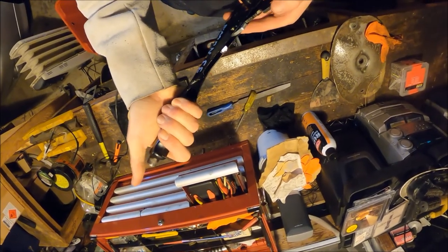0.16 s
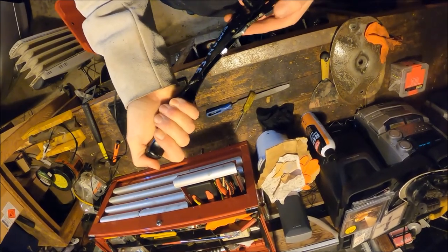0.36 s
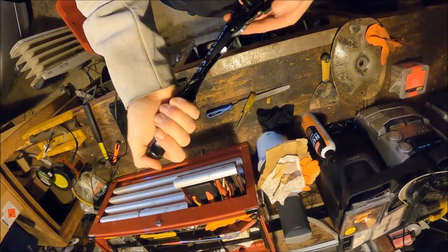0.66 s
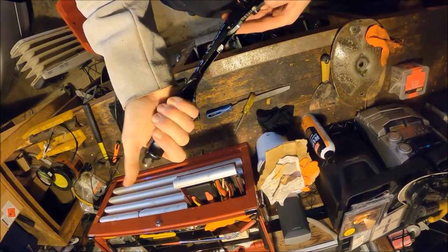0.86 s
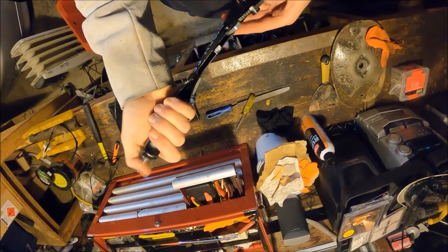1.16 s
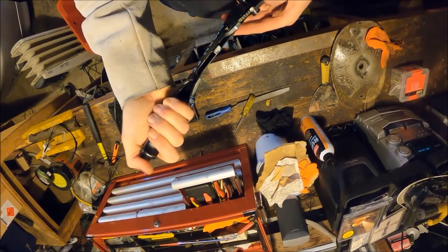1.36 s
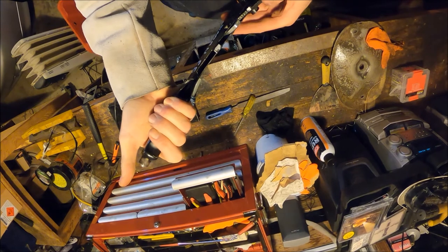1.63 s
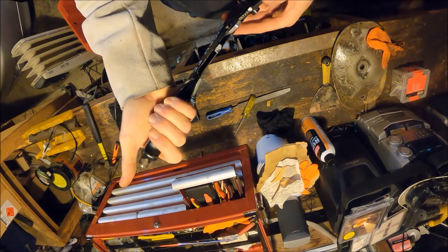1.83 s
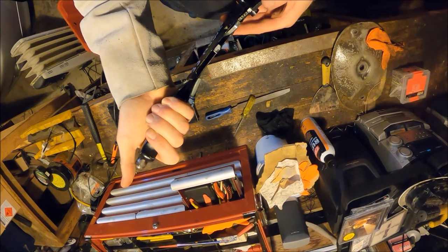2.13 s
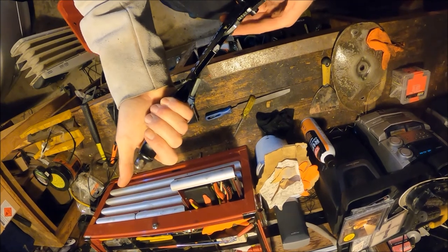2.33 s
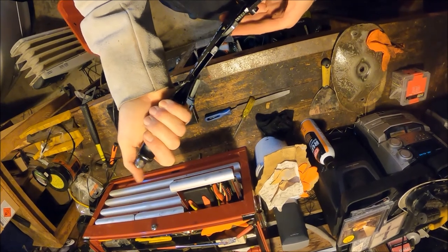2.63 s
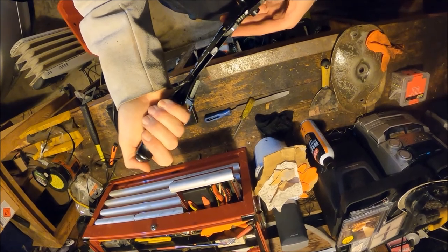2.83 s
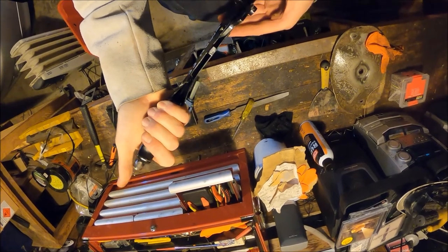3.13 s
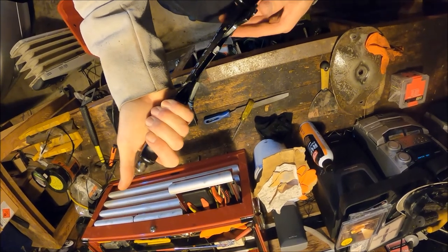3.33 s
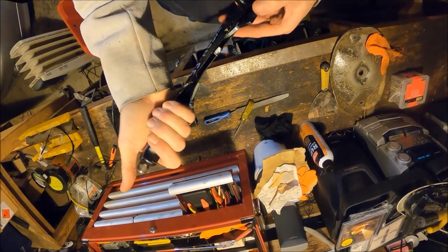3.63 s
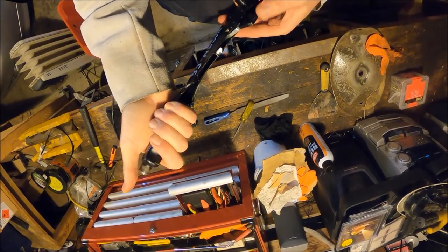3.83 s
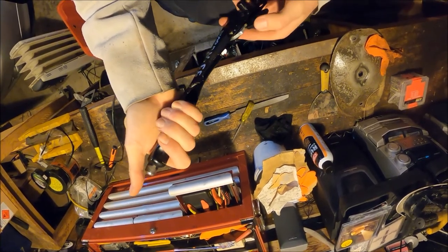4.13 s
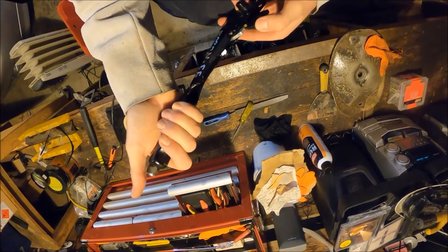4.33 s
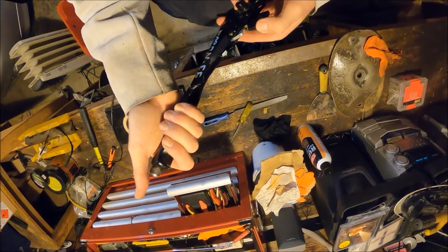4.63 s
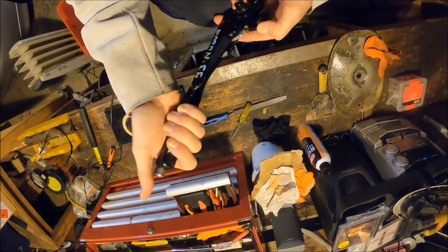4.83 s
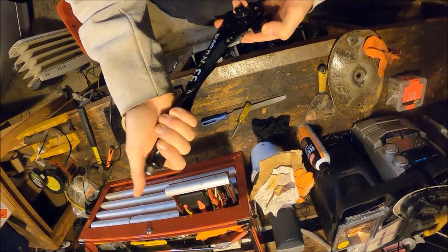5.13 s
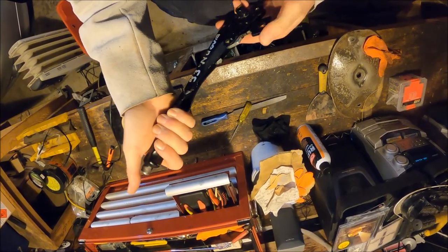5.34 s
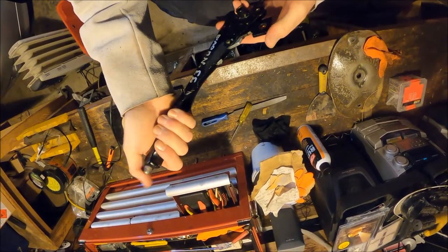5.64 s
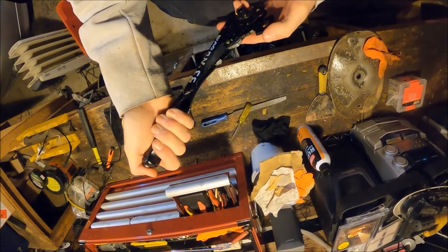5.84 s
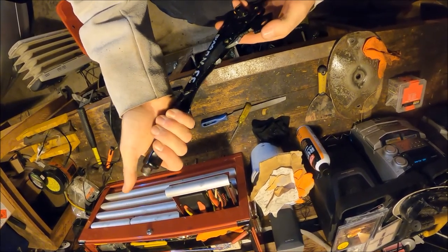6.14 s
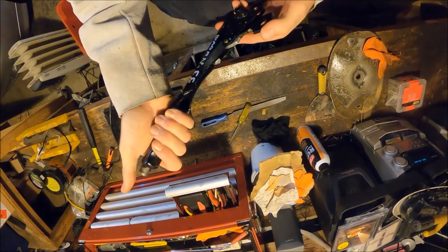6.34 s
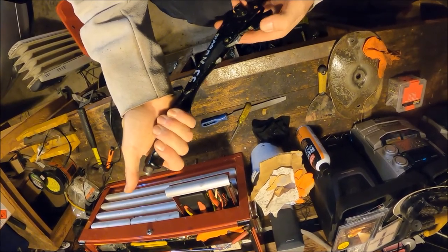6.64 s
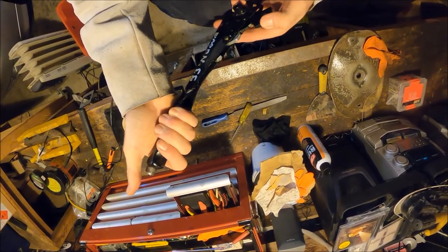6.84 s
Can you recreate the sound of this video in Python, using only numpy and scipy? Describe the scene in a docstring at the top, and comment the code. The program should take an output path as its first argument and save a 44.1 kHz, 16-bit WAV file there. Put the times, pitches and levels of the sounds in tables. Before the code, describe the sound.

Close metallic clicks as a loose handbrake lever's button is pressed and snapped back in an even run, then twice more, in a small workshop.

```python
"""A loose car handbrake lever is worked by hand over a workshop bench, close to the microphone.
The thumb presses the release button and lets it snap back, five times in an even run, then twice more;
the pawl rattles after the sixth snap and later drops into ratchet teeth. Each contact is a chattering push
that rings the same steel modes, each rub a shower of tiny taps into them; thuds and a palm slide are noise.
A small room answers with decaying noise, over a low rumble, faint hiss and thin whine of filtered noise."""
import sys
import numpy as np
from scipy import signal
from scipy.fft import rfft, irfft, next_fast_len
from scipy.io import wavfile

SR = 44100
rng = np.random.default_rng(int(sys.argv[2]) if len(sys.argv) > 2 else 0)


def file_out(sig):
    """Save sig as 16-bit WAV at sys.argv[1]."""
    # one column per channel
    cols = np.atleast_2d(sig).T
    # limit, then scale
    lim = np.clip(cols, -1, 1)
    pcm = np.round(lim * 32767).astype(np.int16)
    wavfile.write(sys.argv[1], SR, pcm)


N = 308259
# signs of the left and right microphone ports
SIDES = np.array([[1], [-1]])


def undb(db):
    """Decibels to gain."""
    return 10 ** (np.asarray(db) / 20)


def rms(x):
    """Root mean square."""
    return np.sqrt(np.mean(x ** 2))


def at_hz(hz, table, axis=1):
    """Read a column of a table on a log-frequency axis."""
    table = np.array(table, float)
    return np.interp(np.log(np.maximum(hz, 1)), np.log(table[:, 0]), table[:, axis])


def band(x, lo, hi, order=2):
    """Butterworth band-pass."""
    sections = signal.butter(order, [lo, min(hi, SR / 2 - 1)], "band", fs=SR, output="sos")
    return signal.sosfilt(sections, x)


def add(out, s, sound):
    """Mix a sound in from time s."""
    i = max(int(s * SR), 0)
    out[..., i:i + sound.shape[-1]] += sound[..., :N - i]


# Contact levels below are set before the mix trims in scene(); brightness is the pawl's share of the blow.
# the pressed button lifts the pawl, slides, meets its stop and rebounds:
# (lift time [s], lift level [dB], lift brightness [dB], stop time [s], stop level [dB], slide level [dB],
#  rebound level [dB], extra handle and rod level [dB], pitch favoured by the place of the blow [Hz])
BUTTON_PRESSES = [(0.0024, -34.5, -14, 0.015, -34.5, -42, -38.5, 0, 3400),
                  (0.3842, -30.5, -0.5, 0.4012, -30, -52, -50, 0, 3600),
                  (0.711, -35.5, -17, 0.7515, -29, -42, -39.5, 0, 3450),
                  (1.089, -37, -1, 1.1132, -28.5, -37, -39, 0, 3400),
                  (1.4633, -38, -23, 1.506, -30.5, -40, -39, -1, 3400),
                  (2.7946, -33.5, -7, 2.856, -37, -62, -42, -4, 3640),
                  (5.7894, -48, 6, 5.7993, -35.5, -46, -45, 5, 2650)]
# the button is let go, its rod knocks and the pawl snaps home:
# (knock time [s], knock level [dB], snap time [s], snap level [dB], snap brightness [dB],
#  chatter decay [s], favoured pitch [Hz])
BUTTON_RELEASES = [(0.2006, -30, 0.2072, -31, 5.5, 0.0034, 3800),
                   (0.5605, -27.5, 0.5664, -30, -2, 0.0048, 3560),
                   (0.9157, -28, 0.9235, -34, 2.5, 0.0038, 3500),
                   (1.2915, -34.5, 1.3029, -21, 0, 0.0012, 3750),
                   (1.6765, -32.5, 1.6833, -19.5, 0, 0.0024, 3460),
                   (3.0591, -43, 3.086, -22, 2, 0.0008, 2700),
                   (6.1452, -31, 6.1512, -26.5, -1, 0.0013, 3400)]
# the pawl rattles after a snap (3.09 s) or drops into ratchet teeth (5.02 to 5.08 s):
# (time [s], level [dB], brightness [dB], chatter decay [s], favoured pitch [Hz])
PAWL_STRIKES = [(3.095, -23, -16, 0.0042, 3520), (3.0994, -31, 5, 0.0034, 5400),
                (5.0235, -18, -4.5, 0.0007, 3680), (5.0485, -20, -2.5, 0.0016, 2740),
                (5.0823, -21.5, -0.5, 0.0005, 2780)]
# the slack frame ticks as the lever is handled:
# (time [s], level [dB], brightness [dB], favoured pitch [Hz])
FRAME_TICKS = [(0.062, -47, -13, 3400), (1.6057, -43.5, -12, 2800), (2.137, -53.5, -33, 3640),
               (2.7736, -56, -8.5, 3500), (2.867, -42, -15, 3550), (3.128, -35, -5, 3700),
               (3.7254, -44.5, -15.5, 3300), (4.1409, -54, -4, 3900), (4.1882, -44, -15, 1850),
               (5.002, -52, -6, 3800), (5.0133, -39, -10, 3900), (5.3412, -38, -11, 3050),
               (5.776, -47, -7, 3920), (6.9826, -55, -7, 3270)]
# the loose button rod taps in its tube: (time [s], level [dB])
TUBE_TAPS = [(0.1377, -58), (0.3677, -49), (0.4494, -50), (0.6207, -43), (0.766, -38), (0.962, -44),
             (1.2154, -57), (3.0286, -51), (3.0721, -43), (4.2394, -36), (5.3031, -51), (5.762, -52),
             (6.0, -46.5), (6.545, -52)]
# how each kind of contact shares its force among the parts [dB]
LIFT_HANDLE_DB, LIFT_ROD_DB = -22, -14
STOP_HANDLE_DB, STOP_ROD_DB, STOP_PAWL_DB = -17.5, -9.5, -7
KNOCK_HANDLE_DB, KNOCK_ROD_DB, KNOCK_PAWL_DB = -10.5, -1.5, -1.5
SNAP_HANDLE_DB, SNAP_ROD_DB = -17, -12
STRIKE_HANDLE_DB, STRIKE_ROD_DB = -22, -12
TICK_HANDLE_DB, TICK_ROD_DB = -14.5, -5
TAP_HANDLE_DB, TAP_FRAME_DB, TAP_PAWL_DB = -22, -12, -24
REBOUND_HANDLE_DB, REBOUND_ROD_DB, REBOUND_PAWL_DB = -24, -11, -9.5
# chatter decay of a light contact; pitch favoured where the rod taps
CHATTER_S, TAP_HZ = 0.0012, 1870
# the spring throws the button back once after each stop and each snap (dB relative to the snap)
STOP_REBOUND_S, SNAP_REBOUND_S, SNAP_REBOUND_DB = 0.025, 0.03, -16


def contacts():
    """Every blow of the mechanism: (s, dB, dB of handle, rod, frame and pawl, chatter s, favoured Hz)."""
    rebound = (REBOUND_HANDLE_DB, REBOUND_ROD_DB, 0, REBOUND_PAWL_DB)
    for lift_s, lift_db, bright_db, stop_s, stop_db, _, rebound_db, body_db, place_hz in BUTTON_PRESSES:
        lift = (LIFT_HANDLE_DB + body_db, LIFT_ROD_DB + body_db, 0, bright_db)
        stop = (STOP_HANDLE_DB + body_db, STOP_ROD_DB + body_db, 0, STOP_PAWL_DB)
        yield lift_s, lift_db, lift, CHATTER_S, place_hz
        yield stop_s, stop_db, stop, CHATTER_S, place_hz
        yield stop_s + STOP_REBOUND_S, rebound_db, rebound, CHATTER_S, place_hz
    for knock_s, knock_db, snap_s, snap_db, bright_db, chatter_s, place_hz in BUTTON_RELEASES:
        knock = (KNOCK_HANDLE_DB, KNOCK_ROD_DB, 0, KNOCK_PAWL_DB)
        snap = (SNAP_HANDLE_DB, SNAP_ROD_DB, 0, bright_db)
        yield knock_s, knock_db, knock, chatter_s, place_hz
        yield snap_s, snap_db, snap, chatter_s, place_hz
        yield snap_s + SNAP_REBOUND_S, snap_db + SNAP_REBOUND_DB, rebound, chatter_s, place_hz
    for s, db, bright_db, chatter_s, place_hz in PAWL_STRIKES:
        yield s, db, (STRIKE_HANDLE_DB, STRIKE_ROD_DB, 0, bright_db), chatter_s, place_hz
    for s, db, bright_db, place_hz in FRAME_TICKS:
        yield s, db, (TICK_HANDLE_DB, TICK_ROD_DB, 0, bright_db), CHATTER_S, place_hz
    for s, db in TUBE_TAPS:
        yield s, db, (TAP_HANDLE_DB, 0, TAP_FRAME_DB, TAP_PAWL_DB), CHATTER_S, TAP_HZ


def chatter(chatter_s, first_blow=3.5, evenness=.7):
    """The force of one contact: a blow, then dying micro-bounces, with the spectrum partly evened out."""
    t = np.arange(SR // 60) / SR
    bounces = rng.standard_normal(len(t)) * rng.random(len(t)) ** 2
    push = bounces * np.exp(-t / chatter_s)
    push[0] = first_blow
    spectrum = rfft(push, 2 * len(t))
    return irfft(spectrum / np.abs(spectrum) ** min(evenness, 1))[:len(t)]


# strong modes of the lever: (pitch [Hz], relative level [dB], time to fall 60 dB [s])
STRONG_MODES = [(757, -1, .025), (1081.4, 1, .02), (1715, -3.5, 0.06), (1825, 4.5, 0.036), (1803, -37, .25),
                (2692, 4.5, 0.049), (2686, -31.5, .38), (2745, -28, .42), (2935, -8.5, .035),
                (3475, -0.5, 0.047), (3587, 2.5, .028), (3600, -34, 0.23), (4260, -10, 0.012),
                (4760, -30.5, .28), (5420, -2, 0.071), (5150, -34, 0.45), (5954, 1.5, 0.046),
                (6200, -8, 0.07), (7620, -11.5, .035), (8490, 1, 0.017), (9000, -2, 0.022),
                (9160, -4, 0.022), (10500, -9.5, 0.056)]
# the crowd of weak modes between them: (pitch [Hz], relative level [dB])
MODE_CROWD = [(300, -12), (750, -1.5), (1400, 0), (1900, -3), (2400, 1.5), (3300, 3.5), (5000, -1),
              (7000, -1.5), (9000, -2.5), (10500, -8.5), (12000, -16), (14000, -20.5), (16000, -32)]
# where handle, rod, frame and pawl each ring: (low edge [Hz], high edge [Hz])
PART_BANDS = [(300, 1400), (1400, 2300), (2300, 4800), (4800, 16000)]


def lever_modes(weak_db=-3):
    """Each part's strong pitches, their decaying rings (modes x time) and a filter for its weak modes."""
    t = np.arange(SR // 5) / SR
    hz, db, t60 = np.transpose(STRONG_MODES)
    spin_and_decay = 2j * np.pi * hz - np.log(1000) / t60
    rings = undb(db)[:, None] * np.exp(np.outer(spin_and_decay, t))
    grid = np.linspace(0, SR / 2, 257)
    # folding the cepstrum makes the filter minimum-phase, so it starts with the tap
    cepstrum = irfft(np.log(undb(weak_db + at_hz(grid, MODE_CROWD))))
    fold = np.r_[1, np.full(255, 2), 1, np.zeros(255)]
    crowd = irfft(np.exp(rfft(cepstrum * fold)))
    parts = []
    for lo, hi in PART_BANDS:
        own = (hz >= lo) & (hz < hi)
        parts.append((hz[own], band(rings[own], .8 * lo, 1.15 * hi), band(crowd, lo, hi, order=3)))
    return parts


def ring(part, blow_db, place_hz=3500, place_db=6.5, place_octaves=.1, spread_db=2, port_spread=0.6,
         crowd_db=26, crowd_growth=.2, crowd_t60=0.026, port_noise=.5):
    """One part's answer to a tap: its place favours some modes, and a harder blow wakes more weak ones."""
    hz, modes, crowd = part
    favour = np.exp(-(np.log2(hz / place_hz) / place_octaves) ** 2)
    db = place_db * favour + spread_db * rng.standard_normal(len(hz))
    weights = undb(db) * np.exp(2j * np.pi * rng.random(len(hz)))
    port_weights = weights * (1 + port_spread * rng.standard_normal((2, len(hz))))
    sound = (port_weights @ modes).imag
    t = np.arange(SR // 30) / SR
    noise = rng.standard_normal(len(t)) + port_noise * rng.standard_normal((2, len(t)))
    clash = noise * np.exp(-np.log(1000) * t / crowd_t60)
    clash = signal.fftconvolve(clash, crowd[None]) * undb(crowd_db + crowd_growth * blow_db)
    sound[:, :clash.shape[1]] += clash
    return sound


def clicks(parts):
    """Steel lands on steel and chatters for a few milliseconds, ringing all four parts."""
    out = np.zeros((2, N))
    attack = SR // 100  # each part is levelled over its first 10 ms
    for s, db, shares_db, chatter_s, place_hz in contacts():
        push, body = chatter(chatter_s), 0
        for part, part_db in zip(parts, shares_db):
            sound = ring(part, db, place_hz)
            onset = signal.fftconvolve(sound[:, :attack], push[None, :attack])[:, :attack]
            body = body + sound * undb(db + part_db) / rms(onset)
        add(out, s, signal.fftconvolve(body, push[None]))
    return out


# a released rod gathers speed before it knocks, then drags the pawl home (dB relative to the knock)
RUN_UP_S, RUN_UP_FROM_DB, RUN_UP_TO_DB, DRAG_DB = 0.016, -26, -5, -6
# a pressed button scrapes harder as its spring tightens
SLIDE_RISE_DB = 5
# a part rubs while it takes up its slack, just before it strikes (dB relative to the blow)
SLACK_S, SLACK_FROM_DB, SLACK_TO_DB = 0.022, -30, -20
# the button grinds briefly against its stop (dB relative to the stop)
SETTLE_S, SETTLE_FROM_DB, SETTLE_TO_DB = 0.045, -13, -24


def slides():
    """The rubbing before, between and after the blows: (start s, end s, start dB, end dB)."""
    for s, db, *_ in BUTTON_PRESSES + PAWL_STRIKES + FRAME_TICKS:
        yield s - SLACK_S, s, db + SLACK_FROM_DB, db + SLACK_TO_DB
    for lift_s, _, _, stop_s, stop_db, slide_db, *_ in BUTTON_PRESSES:
        yield lift_s, stop_s, slide_db - SLIDE_RISE_DB / 2, slide_db + SLIDE_RISE_DB / 2
        yield stop_s, stop_s + SETTLE_S, stop_db + SETTLE_FROM_DB, stop_db + SETTLE_TO_DB
    for knock_s, knock_db, snap_s, *_ in BUTTON_RELEASES:
        yield knock_s - RUN_UP_S, knock_s, knock_db + RUN_UP_FROM_DB, knock_db + RUN_UP_TO_DB
        yield knock_s, snap_s, knock_db + DRAG_DB, knock_db + DRAG_DB


def scrapes(parts, slips_per_s=1500, slip_spread_db=5, handle_db=1, rod_db=1, pawl_db=-5):
    """Rubbing steel sticks and slips: a shower of tiny taps into the same four parts."""
    out, longest = np.zeros((2, N)), SR // 8
    for start, end, start_db, end_db in slides():
        n = int(np.clip((end - start) * SR, SR // 200, longest))
        slip_now = rng.random(longest) < slips_per_s / SR
        slips = (slip_now * undb(slip_spread_db * rng.standard_normal(longest)))[:n]
        slips[0] = 1
        shares_db = (handle_db, rod_db, 0, pawl_db)
        body = sum(undb(db) * ring(part, end_db) for part, db in zip(parts, shares_db))
        push = slips / rms(slips) * undb(np.linspace(start_db, end_db, n))
        add(out, start, signal.fftconvolve(body / np.linalg.norm(body[0]), push[None]))
    return out


# how the two ports hear the lever: (pitch [Hz], left minus right level [dB], left phase lead [rad])
PORT_HEARING = [(300, 3, .3), (800, 0, .25), (1400, -1.5, .6), (2600, .7, 1.15), (4200, 3.5, 1.15),
                (8200, 4.8, 1.05), (11000, 1, 1.2), (13500, -3, 1.6)]


def place(dry):
    """The lever sits a little left: that port leads in phase, and the level balance varies with pitch."""
    n = next_fast_len(N)
    hz = np.arange(n // 2 + 1) * SR / n
    # each port takes half of the difference
    gain = undb(SIDES * at_hz(hz, PORT_HEARING) / 2)
    lead = np.exp(1j * SIDES * at_hz(hz, PORT_HEARING, axis=2) / 2)
    return irfft(rfft(dry, n) * gain * lead, n)[:, :N]


# the lever jolting the hands that hold it: (time [s], level [dB])
LEVER_JOLTS = [(1.303, -58), (1.505, -65.5), (1.686, -53.5), (5.024, -52.5), (5.055, -41.5), (5.084, -56)]


def jolts(low_hz=25, high_hz=190, side_db=2.5):
    """Some blows shake the whole lever: a short dull thud of low noise, raised left and lowered right."""
    out, t = np.zeros((2, N)), np.arange(SR // 5) / SR
    fade = np.exp(-t / .02)
    for s, db in LEVER_JOLTS:
        shake = .5 * rng.standard_normal(len(t)) + rng.standard_normal((2, len(t)))
        thud = band(shake * undb(side_db * SIDES) * fade, low_hz, high_hz)
        add(out, s, thud * undb(db) / rms(thud[:, :SR // 40]))
    return out


# the palm sliding to a new grip on the ratchet plate: (time [s], level [dB])
PALM_GRIP = [(3.92, -92), (4.0, -70.5), (4.11, -69.5), (4.3, -83)]


def palm(low_hz=800, high_hz=6000):
    """Skin slides softly over painted steel: band-passed noise that is silent outside the slide."""
    rub = band(rng.standard_normal((2, N)), low_hz, high_hz)
    db = np.interp(np.arange(N) / SR, *np.transpose(PALM_GRIP), left=-np.inf, right=-np.inf)
    return rub / rms(rub) * undb(db)


# the room's answer, before band filtering and the shared build-up and late fade:
# (pitch [Hz], tail level [dB], time to fall 60 dB [s])
ROOM_ANSWER = [(150, -11, .5), (600, -13.5, 0.22), (1500, -13, .55), (3500, -10.5, 0.46),
               (8100, -14.5, 0.52), (12000, -13, 0.35), (16000, -15.5, .25)]


def room(dry, build_s=0.0052, early_db=3, early_s=.015, late_s=.17, shared=1.0):
    """Bench and shelves scatter the sound first, then the workshop dies away ever faster, band by band."""
    t = np.arange(SR // 2) / SR
    edges = np.geomspace(80, 17000, 22)
    noise = shared * rng.standard_normal(len(t)) + rng.standard_normal((2, len(t)))
    build_up = 1 - np.exp(-(t / build_s) ** 2)
    early = 1 + undb(early_db) * np.exp(-t / early_s)
    shape = build_up * early * np.exp(-(t / late_s) ** 2)
    answer = 0
    for lo, hi in zip(edges, edges[1:]):
        hz = np.sqrt(lo * hi)
        tail = noise * shape * np.exp(-np.log(1000) * t / at_hz(hz, ROOM_ANSWER, axis=2))
        tail = band(tail / np.linalg.norm(tail[0]), lo, hi, order=4)
        answer = answer + undb(at_hz(hz, ROOM_ANSWER)) * tail
    return signal.fftconvolve(dry, answer, axes=1)[:, :N]


# tone of the rumble and hiss: (pitch [Hz], relative level per Hz [dB])
RUMBLE_TONE = [(12, -11.5), (25, 0.5), (50, -7), (105, -12), (160, -7.5), (260, -5.5), (400, -8.5),
               (600, -19), (1300, -18), (2000, -23.5), (3200, -29.5), (5000, -34.5), (9000, -43),
               (16000, -54.5)]
# their level before the left/right tilt: (time [s], level [dB])
RUMBLE_LEVEL = [(0, -65.5), (3.2, -66.5), (4.3, -64.5), (4.8, -61), (5.2, -68.5), (7, -66.5)]
WHINE_HZ, WHINE_DB = 3140, -85.5


def background(shared=0.57, side_db=0.73, whine_half_width_hz=14, wander_db=5, wander_level_db=-2):
    """Low rumble whose bands swell and sink on their own, a faint hiss and a thin narrow-noise whine."""
    n = next_fast_len(N)
    t, hz = np.arange(N) / SR, np.arange(n // 2 + 1) * SR / n
    noise = shared * rng.standard_normal(N) + rng.standard_normal((2, N))
    steady = irfft(rfft(noise, n) * undb(at_hz(hz, RUMBLE_TONE)), n)[:, :N]
    knots = np.linspace(0, N / SR, 45)
    wander = 0
    for f in (163.3, 199, 235, 289.4):
        swell_db = wander_db * np.interp(t, knots, rng.standard_normal(len(knots)))
        wander = wander + band(noise, .9 * f, 1.1 * f) * undb(swell_db) / f
    rumble = steady / rms(steady) + undb(wander_level_db) * wander / rms(wander)
    whine = band(rng.standard_normal((2, N)), WHINE_HZ - whine_half_width_hz, WHINE_HZ + whine_half_width_hz)
    # raised left, lowered right
    db = np.interp(t, *np.transpose(RUMBLE_LEVEL)) + side_db * SIDES
    return rumble / rms(rumble) * undb(db) + whine / rms(whine) * undb(WHINE_DB)


def scene(click_db=-1.0, scrape_db=-2):
    """The lever and its room, with the thuds, palm and background added dry."""
    parts = lever_modes()
    lever = place(undb(click_db) * clicks(parts) + undb(scrape_db) * scrapes(parts))
    return lever + room(lever) + jolts() + palm() + background()


TOP_HZ = 16300


def record(dry):
    """The recorder cuts the top with a steep low-pass."""
    return signal.sosfilt(signal.ellip(8, .2, 70, TOP_HZ, fs=SR, output="sos"), dry)


dry = scene()
out = record(dry)
file_out(out)
```